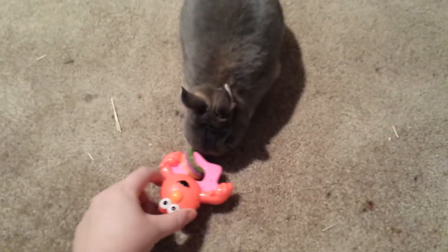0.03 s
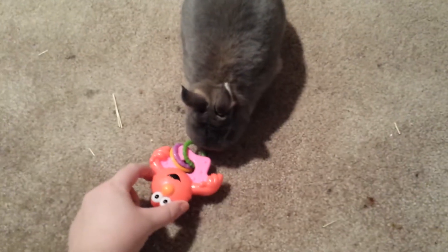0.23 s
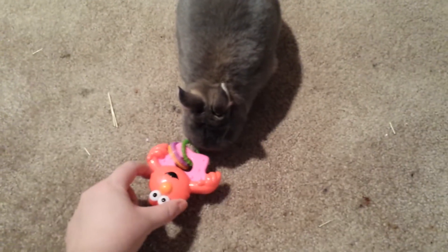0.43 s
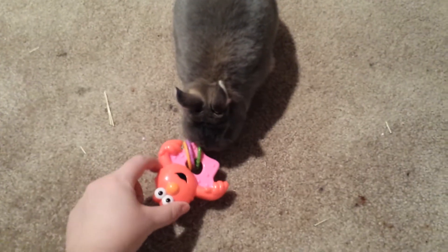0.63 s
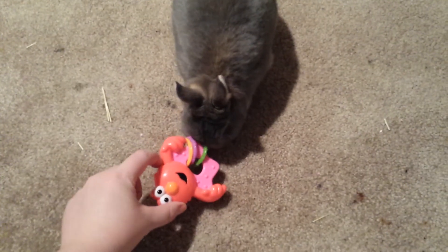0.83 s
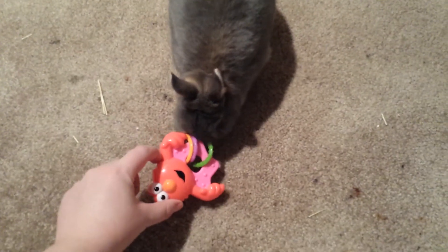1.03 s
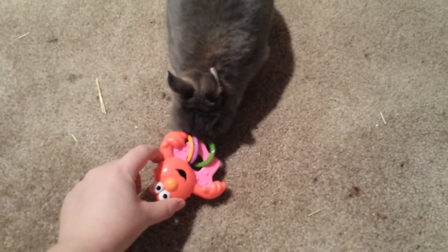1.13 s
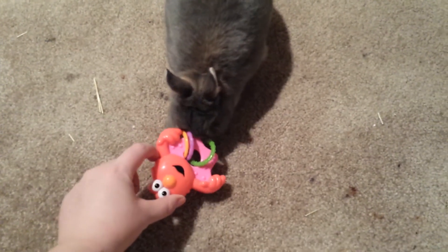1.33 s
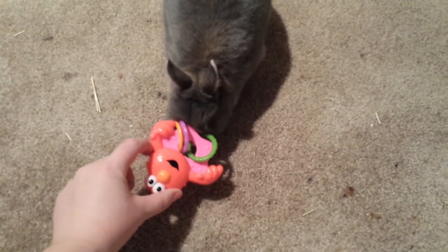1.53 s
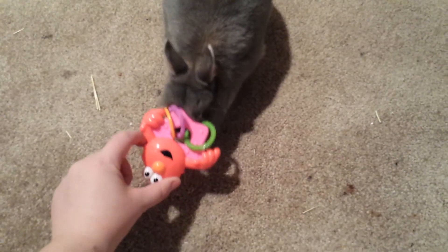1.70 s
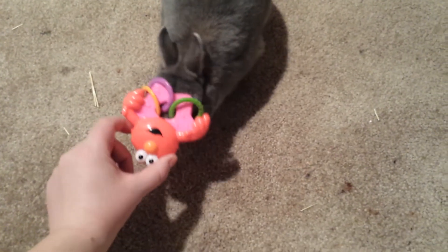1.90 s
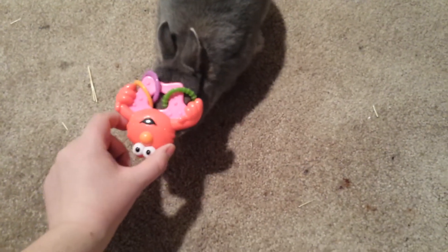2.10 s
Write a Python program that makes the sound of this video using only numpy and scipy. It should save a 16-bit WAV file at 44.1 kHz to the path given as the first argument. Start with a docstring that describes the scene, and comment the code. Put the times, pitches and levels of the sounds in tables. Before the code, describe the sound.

Bright, brittle clicks of teeth and rings on hard plastic come in short bursts with quiet gaps, densest at the end, over faint rubbing, low handling rumble and quiet room hum, heard close indoors.

```python
"""Low room hum, hiss, soft handling rumble and faint rubbing open; then a rabbit nibbles a plastic ring toy.
Each contact of tooth or ring is a dry click: scrape, crack, decaying sine modes and chattering grains.
Rubbing is fine coloured grains; rumble and hiss are coloured noise; the hum is a wavering sine.
A small carpeted room adds short tails of decaying noise; the left microphone port resonates in the treble."""
import sys
import numpy as np
from scipy import signal
from scipy.fft import rfft, irfft, next_fast_len
from scipy.io import wavfile
from scipy.ndimage import map_coordinates

SR = 44100
rng = np.random.default_rng(int(sys.argv[2]) if len(sys.argv) > 2 else 0)


def output_pcm(signal):
    """Save a mono or channel-first signal as 16-bit PCM at the path in sys.argv[1].

    Samples are clipped to [-1, 1] before scaling.
    """
    pcm = np.clip(np.atleast_2d(signal).T, -1, 1) * 32767
    wavfile.write(sys.argv[1], SR, np.round(pcm).astype(np.int16))


N = 95167  # samples

SCRAPE_S = 0.001495  # tooth slides this long before the snap


def amp(db):
    """Decibels to gain."""
    return 10 ** (np.asarray(db) / 20)


def unit(x):
    """Scale to rms 1."""
    return x / np.sqrt(np.mean(x ** 2) + 1e-20)


def along(points, hz):
    """Interpolate (Hz, value) points on a log frequency axis."""
    point_hz, value = np.transpose(points)
    return np.interp(np.log(hz + 1), np.log(point_hz + 1), value)


def filtered(x, response):
    """Multiply the spectrum of x by response(Hz)."""
    n = x.shape[-1]
    padded = next_fast_len(n + n // 8)
    spectrum = rfft(x, padded) * response(np.fft.rfftfreq(padded, 1 / SR))
    return irfft(spectrum, padded)[..., :n]


def coloured(x, level_db, size=2048):
    """Causal minimum-phase filter with gain level_db(Hz), by folding the cepstrum."""
    gain = amp(level_db(np.fft.rfftfreq(size, 1 / SR)))
    cepstrum = irfft(np.log(gain))
    cepstrum[1:size // 2] *= 2
    cepstrum[size // 2 + 1:] = 0
    impulse = irfft(np.exp(rfft(cepstrum)))
    return signal.fftconvolve(x, impulse)[:len(x)]


def fade(t, t60):
    """Exponential decay, 60 dB in t60 seconds."""
    return np.exp(-np.log(1000) * t / t60)


def grains(per_s, size):
    """Sparse one-sample impacts of random size, rms 1."""
    strength = rng.standard_normal(size)
    return unit(strength * (rng.random(size) < per_s / SR))


def pair(noises, alike):
    """Mix two unrelated noises to left and right with a given likeness per frequency."""
    def mid_side_gains(f):
        angle = np.arccos(np.clip(along(alike, f), -1, 1)) / 2
        return np.array([np.cos(angle), np.sin(angle)])

    mid, side = filtered(noises, mid_side_gains)
    return np.array([mid + side, mid - side])


def room_tone():
    """Low rumble and soft hiss from coloured noise, plus a sine hum wavering in level and phase."""
    # background spectrum, before scaling: hz, relative_density_db
    floor_colour = [(40, -12.5), (65, -2.5), (330, -6.5), (550, -12.5), (1000, -15.5), (2600, -21.5),
                    (9000, -19), (15500, -24.5)]
    # left-right likeness: hz, likeness (0-1)
    floor_alike = [(60, 1), (300, 0.67), (1000, 0.041), (4000, 0.013)]
    # hum: hz, nominal_rms_db
    hum_tones = [(162, -77)]
    floor_db, hum_waver = -67, .3
    noises = pair(rng.standard_normal((2, N)), floor_alike)
    air = filtered(noises, lambda f: amp(along(floor_colour, f)))
    t = np.arange(N) / SR

    def waver():
        return map_coordinates(rng.standard_normal(size=64), [t * 6])  # 6 random points per s

    hum = 0
    for hz, db in hum_tones:
        level = np.sqrt(2) * amp(db) * (1 + hum_waver * waver())
        hum = hum + level * np.sin(2 * np.pi * hz * t + waver())
    return amp(floor_db) * unit(air) + hum


def handling():
    """Hand, toy and paws shift with each tug: low coloured noise under a level curve."""
    # soft rumble of tugging: time_s, level_db
    tug_levels = [(0, -66.5), (.14, -62), (.27, -69.5), (.37, -66), (.76, -75.5), (1.0, -62.5), (1.27, -64),
                  (1.42, -75.5), (1.79, -63), (1.98, -60), (2.15, -69.5)]
    # rumble spectrum, before scaling: hz, relative_level_db
    tug_colour = [(45, -21), (62, 0.5), (170, 1), (230, -13), (340, 0.5), (480, -17), (900, -19),
                  (2500, -22.5)]
    side_db = -7.5  # relative to mid
    mid, side = filtered(rng.standard_normal((2, N)), lambda f: amp(along(tug_colour, f)))
    side = amp(side_db) * side
    level = amp(np.interp(np.arange(N) / SR, *np.transpose(tug_levels)))
    return level * unit(np.array([mid + side, mid - side]))


def room(x, size=8192):
    """Convolve with a fresh short noise tail per port; each frequency dies at its own speed."""
    # decay: hz, t60_s
    room_decay = [(300, 0.43), (1300, 0.12), (6000, 0.16), (12000, 0.14)]
    # tail spectrum: hz, gain_db
    room_colour = [(300, 2.5), (2800, 3.5), (3800, 0.5), (5700, -3), (9000, 1.5), (15000, -10)]
    # left-right likeness: hz, likeness (0-1)
    room_alike = [(500, 0.48), (1200, 0.52), (2500, 0.022)]
    build_s = 0.00074
    noises = pair(rng.standard_normal((2, size)), room_alike)
    hz, t, z = signal.stft(noises, SR, nperseg=128)
    shape = fade(t, along(room_decay, hz)[:, None]) * (1 - np.exp(-t / build_s))
    tail = signal.istft(z * shape, SR, nperseg=128)[1]
    tail = tail / np.linalg.norm(tail[0])
    tail = filtered(tail, lambda f: amp(along(room_colour, f)))
    return signal.fftconvolve(x[None], tail, axes=1)


def mouthing():
    """Lips and teeth rub the plastic in fine grains, harder at each nip."""
    # faint rubbing, before the left port: time_s, level_db
    rub_levels = [(0.0, -66.5), (.2, -71), (.5, -82.5), (.72, -71.5), (.86, -78), (1.17, -88), (1.42, -103),
                  (1.76, -67), (2.15, -82)]
    # short tooth scrapes without a snap, added to the rubbing gain: start_s, level_db
    nips = [(0.181, -57), (.316, -65.5), (.419, -61), (.694, -63.5), (1.727, -59), (1.746, -59.5)]
    # rub spectrum, before scaling: hz, relative_level_db
    rub_colour = [(300, -24), (900, -1.5), (1800, -3), (3200, -5.5), (6000, -8), (9000, -22.5),
                  (15000, -3.5)]
    rub_per_s, nip_t60_s = 970, 0.059
    t = np.arange(N) / SR
    level = amp(np.interp(t, *np.transpose(rub_levels)))
    for start_s, db in nips:
        level = level + amp(db) * (t >= start_s) * fade(abs(t - start_s), nip_t60_s)
    rub = coloured(grains(rub_per_s, N), lambda f: along(rub_colour, f))
    return level * unit(rub + room(rub)[:, :N])


def click(spot_hz, size=4096):
    """One contact: a short scrape, a crack, modes of toy and struck spot, and a little chatter."""
    # toy modes: nominal_hz, nominal_level_db
    toy_modes = [(1120, -12.5), (1750, -11), (2050, -19), (2650, -13), (4850, -9.5), (5550, -9.5),
                 (7510, -12)]
    spot_db, scrape_db, chatter_db = -5.5, -2.5, -15
    crack_t60_s, chatter_t60_s, chatter_per_s = 0.0092, .034, 980
    ring_t60_s, ring_shortens = 0.014, 0.14  # at 1 kHz; power by which higher modes die sooner
    scatter_db, detune = 2, 0.02  # standard deviations; detune is a fraction of mode frequency
    contact_rise_s = .0004
    since_snap = np.arange(size) / SR - SCRAPE_S
    t = np.maximum(since_snap, 0)

    hz, db = np.transpose([*toy_modes, (spot_hz, spot_db)])[:, :, None]
    level_chance, pitch_chance, sign_chance = rng.standard_normal((3, len(hz), 1))
    mode_gain = np.sign(sign_chance) * amp(db + scatter_db * level_chance)
    ring = mode_gain * np.sin(2 * np.pi * hz * (1 + detune * pitch_chance) * t)
    ring = ring * fade(t, ring_t60_s * (1000 / hz) ** ring_shortens)

    chatter = amp(chatter_db) * grains(chatter_per_s, size) * fade(t, chatter_t60_s)
    crack = rng.standard_normal(size) * fade(t, crack_t60_s)
    snap = (crack + ring.sum(0) + chatter) * (1 - np.exp(-t / contact_rise_s))
    scrape_level = amp(scrape_db) * (since_snap < 0) * (1 + since_snap / SCRAPE_S) ** 2
    return snap + scrape_level * rng.standard_normal(size)


def balanced(sound, knock_db, clack_db, edge_db):
    """Set the knock, clack and edge bands of a sound against a treble of energy 1."""
    knock_hz, clack_hz, edge_hz = 1520, 3600, 7580  # upper end of knock and clack; start of edge

    def below(f, corner_hz):
        return 1 / (1 + (f / corner_hz) ** 8)

    def bands(f):
        """Shares of knock, clack, treble and edge; they sum to 1."""
        edges = [0 * f, below(f, knock_hz), below(f, clack_hz), below(f, edge_hz), 1 + 0 * f]
        return np.diff(edges, axis=0)

    spectrum = rfft(sound) * bands(np.fft.rfftfreq(len(sound), 1 / SR))
    present_db = 10 * np.log10(np.mean(abs(spectrum) ** 2, axis=1))
    gains_db = np.array([knock_db, clack_db, 0, edge_db]) - present_db
    return coloured(sound, lambda f: gains_db @ bands(f))


def nibbling():
    """Clicks whose treble partly differs between ports; the tail mixes an impulse with half the click."""
    # contacts: snap_s, treble_db (before clicks_db and colour), spot_hz (nominal),
    # knock_db, clack_db, edge_db (relative to treble, before colour)
    clicks = [(0.0919, -47, 6160, -22, -7, -5), (0.0951, -47.5, 6000, -10.5, -15, -2),
              (0.1114, -34.5, 5700, -25.5, -14.5, -9), (0.1272, -53.5, 6000, -7, -3.5, -2),
              (0.1318, -35, 5810, -17, -8.5, -8), (0.2156, -61.5, 5900, 1, 0.5, -4),
              (0.4517, -61, 5430, -8, -2, -17), (0.573, -47, 5030, -13, -5.5, -12),
              (0.6612, -57.5, 5960, -22, -16, -15), (0.9051, -42.5, 6360, -13, -5, -5),
              (0.9105, -39, 6370, -18, -7, -3), (0.947, -58, 6050, -3.5, 3, -13),
              (0.9626, -37, 6660, -19.5, -8.5, -7), (0.981, -47.5, 6000, -13, -10, -2),
              (0.9859, -43.5, 6300, -22, -7.5, -6), (1.059, -56, 6150, -5, 5, -7),
              (1.068, -26.5, 5600, -26, -11.5, -6.5), (1.0867, -37, 5680, -19.5, -10, -17),
              (1.0918, -31, 5150, -26, -8.5, -1), (1.099, -43, 5570, -13.5, -28, -1),
              (1.2149, -55, 5600, -0.5, -17, -3), (1.2191, -38, 5620, -23.5, -5, -2),
              (1.252, -44, 6440, -15, -5.5, -3), (1.2616, -37.5, 6800, -25, 1, 3.5),
              (1.266, -39, 6180, -13.5, -10, -1.5), (1.5493, -61.5, 5630, -3, -4.5, -18),
              (1.58, -46.5, 6270, -11.5, -15, -12), (1.594, -41, 5310, -18, -13, -12.5),
              (1.6046, -48.5, 5630, -15.5, -7, -27), (1.6268, -31.5, 5930, -16.5, -20, -12.5),
              (1.7103, -46, 6100, -12, -7, -13), (1.715, -45, 5440, -25, -14, -14),
              (1.7604, -36, 6660, -19, -18, -8.5), (1.764, -43.5, 5650, -10.5, -7, -4),
              (1.806, -47, 6200, -18, -5.5, -9), (1.8506, -61, 5880, -2, 2, -12),
              (1.8911, -44, 6160, -9.5, -1.5, -12), (1.8955, -46, 6060, -20, -21, -9),
              (1.8992, -39.5, 5680, -13.5, -10.5, -11.5), (1.947, -44.5, 5800, -15, -7, -14),
              (1.9604, -31, 6140, -19, -7, -2), (1.9713, -25.5, 6050, -27, -17.5, -14),
              (1.9801, -27, 5450, -25.5, -15.5, -2.5), (1.9881, -34, 6240, -15, -8, -20),
              (2.0087, -34, 6340, -20, -15.5, -9.5)]
    # spectrum of all clicks: hz, gain_db
    click_colour = [(200, -15), (560, -6), (850, 5.5), (1300, -0.5), (1750, -1), (2500, -1.5), (3300, 0),
                    (4600, 2.5), (6100, -4.5), (8500, 2), (16000, -5.5)]
    clicks_db, room_db = 19.5, -8
    apart_share, apart_hz = .45, 3000  # power share unlike between ports; where it sets in

    def port_gains(f):
        share = apart_share * f ** 2 / (f ** 2 + apart_hz ** 2)
        return np.sqrt([1 - share, share])

    out = np.zeros((2, N + SR))
    for snap_s, treble_db, spot_hz, *balance_db in clicks:
        direct = balanced(click(spot_hz), *balance_db)
        apart = balanced(click(spot_hz), *balance_db)
        impulse = signal.unit_impulse(len(direct), round(SCRAPE_S * SR))
        diffuse = balanced(impulse, *balance_db)
        sound = amp(room_db) * room(diffuse + direct / 2)
        sound[0, :len(direct)] += direct
        sound[1, :len(direct)] += filtered(np.array([direct, apart]), port_gains).sum(0)
        start = round((snap_s - SCRAPE_S) * SR)
        out[:, start:][:, :sound.shape[1]] += amp(treble_db + clicks_db) * sound
    return np.array([coloured(port[:N], lambda f: along(click_colour, f)) for port in out])


def scene():
    """Toy sounds reach the resonant left port a moment after the right one; rumble and room tone join."""
    # left port resonance: hz, gain_db
    left_port = [(1000, 1.5), (1900, 7), (3300, -1), (4500, 3.5), (5300, 9), (5950, 15), (6500, 11.5),
                 (7500, 5), (9000, -1.5), (15000, 0)]
    left_lag_s = .00011
    left, right = nibbling() + mouthing()
    left = coloured(left, lambda f: along(left_port, f))
    left = filtered(left, lambda f: np.exp(-2j * np.pi * f * left_lag_s))
    return np.array([left, right]) + handling() + room_tone()


def record(dry):
    """Band limit: nothing is kept from top_hz upward."""
    top_hz = 15700
    return filtered(dry, lambda f: f < top_hz)


dry = scene()
out = record(dry)
output_pcm(out)
```